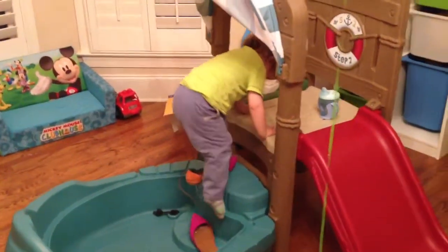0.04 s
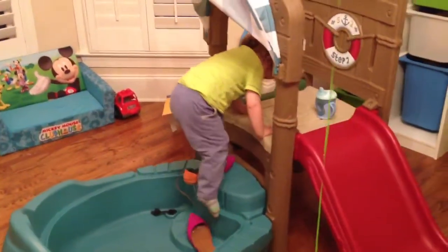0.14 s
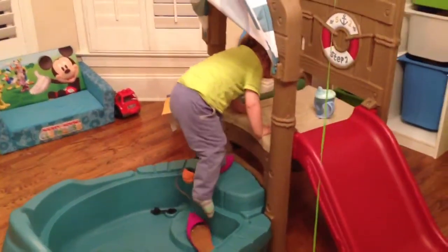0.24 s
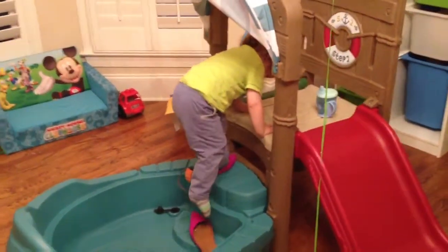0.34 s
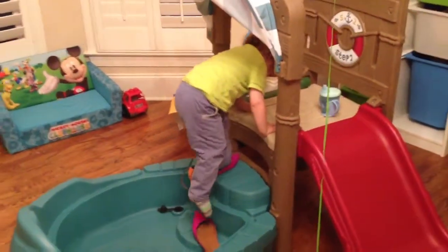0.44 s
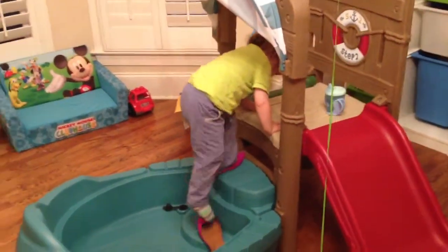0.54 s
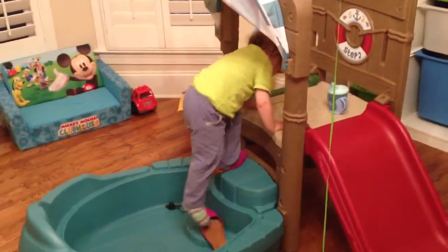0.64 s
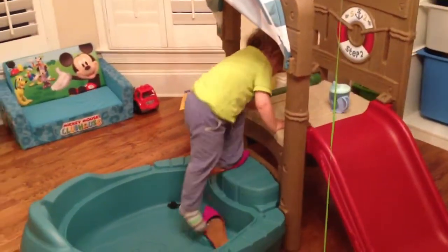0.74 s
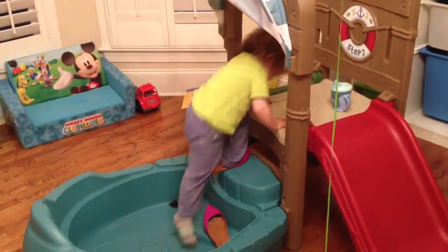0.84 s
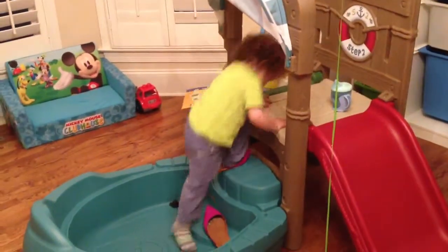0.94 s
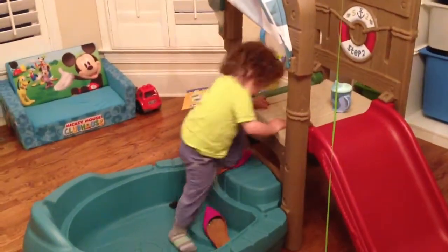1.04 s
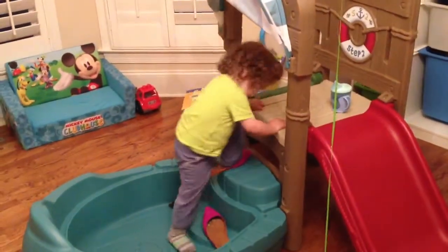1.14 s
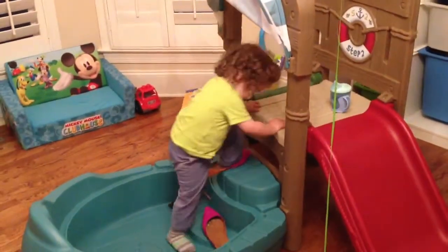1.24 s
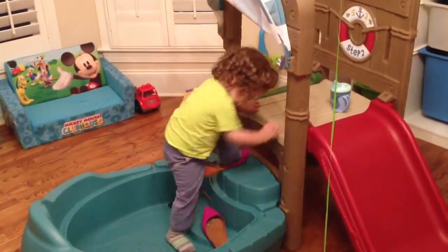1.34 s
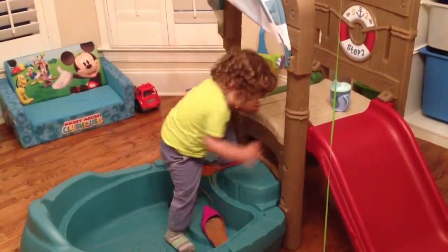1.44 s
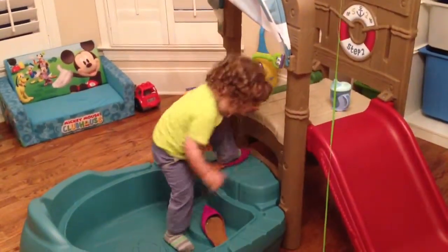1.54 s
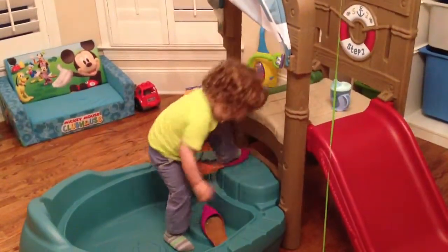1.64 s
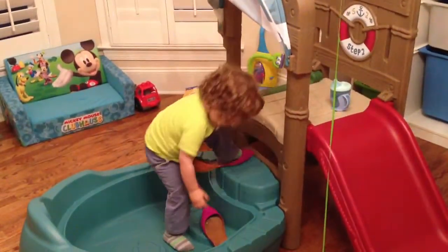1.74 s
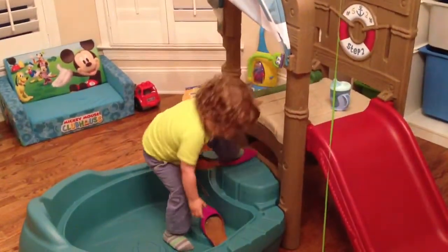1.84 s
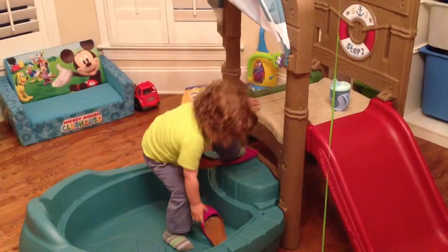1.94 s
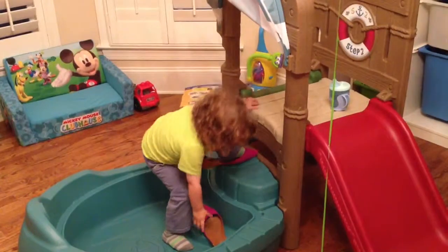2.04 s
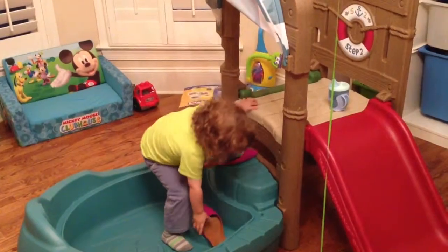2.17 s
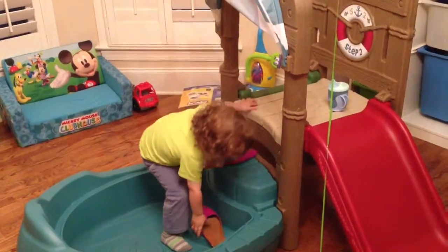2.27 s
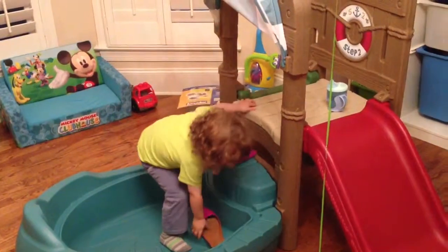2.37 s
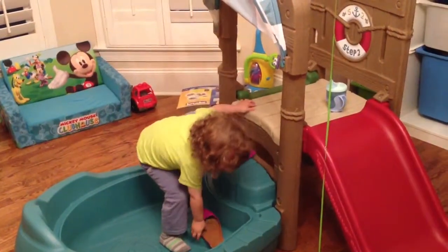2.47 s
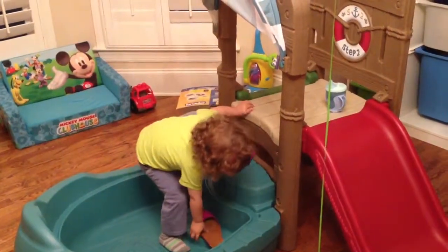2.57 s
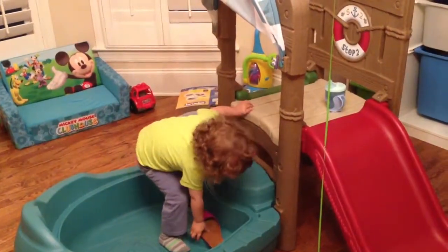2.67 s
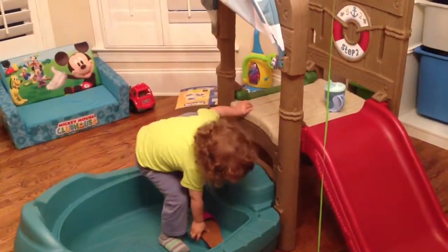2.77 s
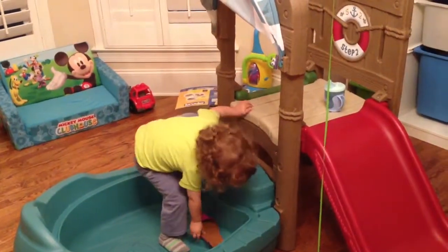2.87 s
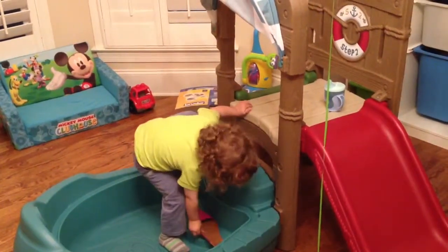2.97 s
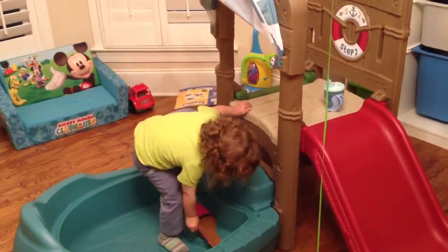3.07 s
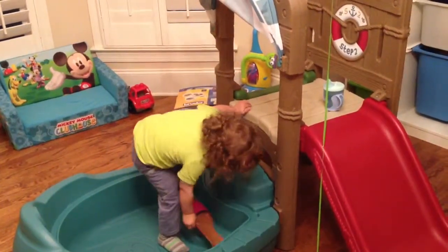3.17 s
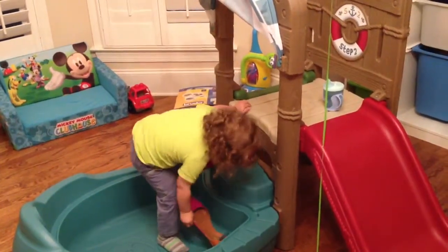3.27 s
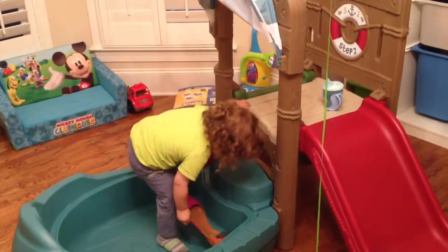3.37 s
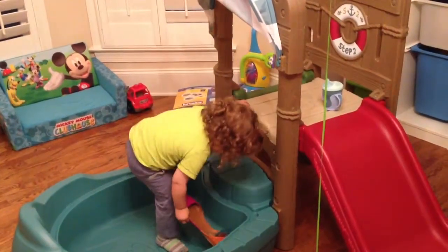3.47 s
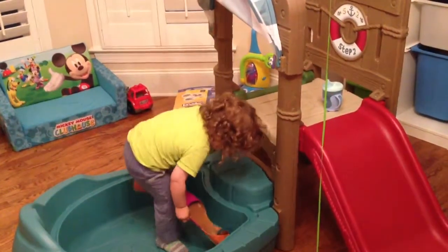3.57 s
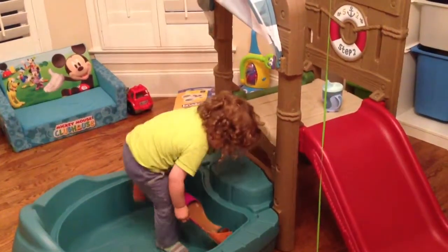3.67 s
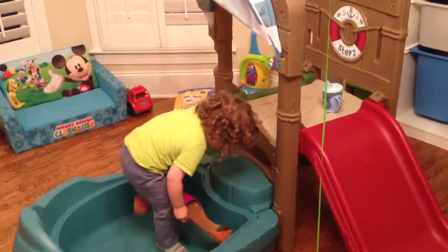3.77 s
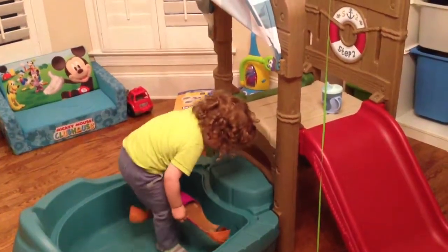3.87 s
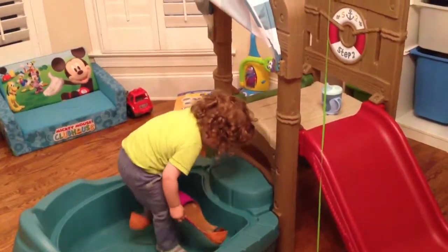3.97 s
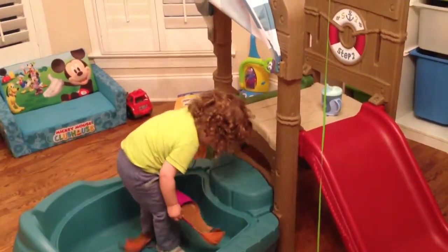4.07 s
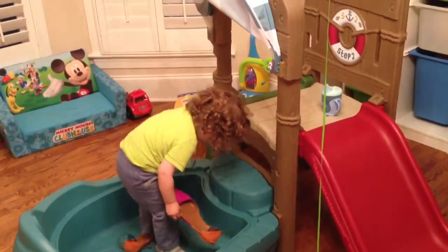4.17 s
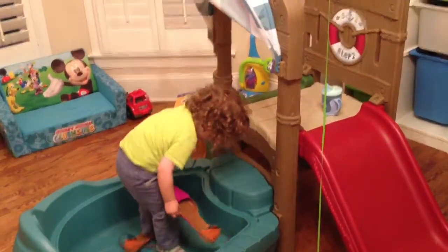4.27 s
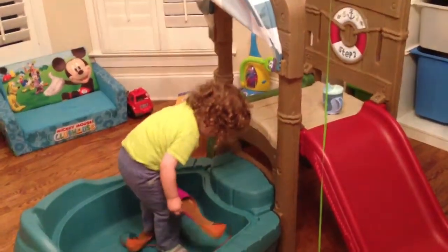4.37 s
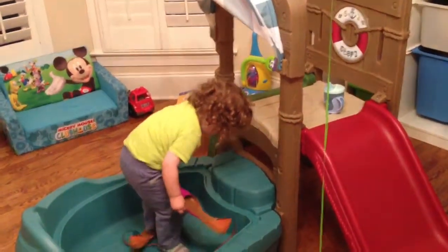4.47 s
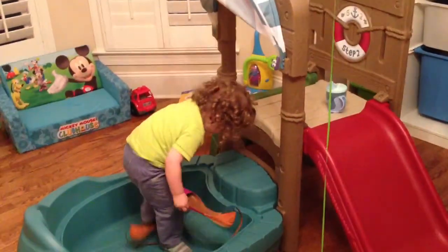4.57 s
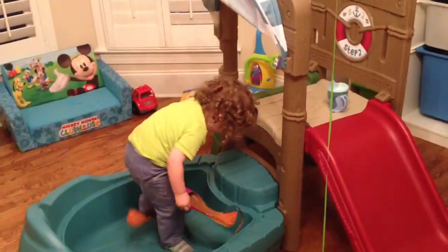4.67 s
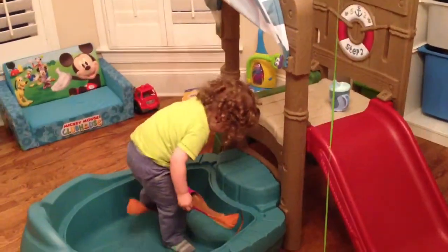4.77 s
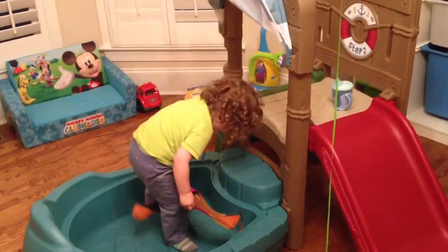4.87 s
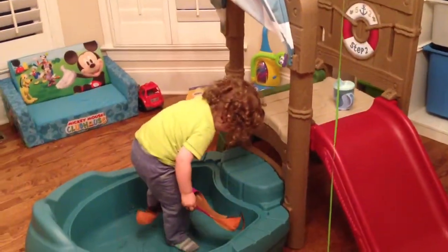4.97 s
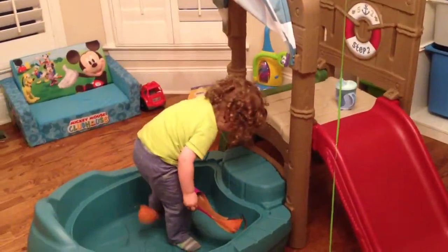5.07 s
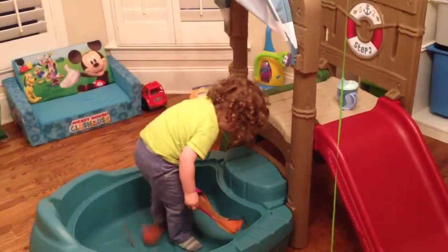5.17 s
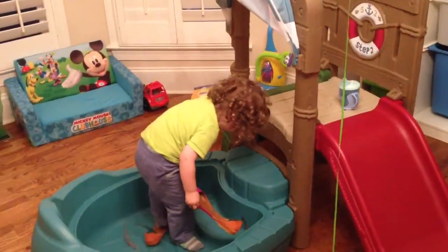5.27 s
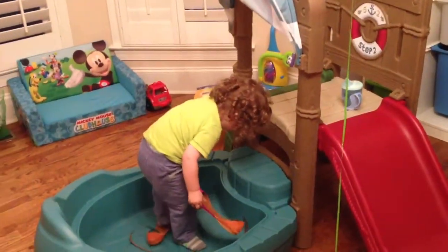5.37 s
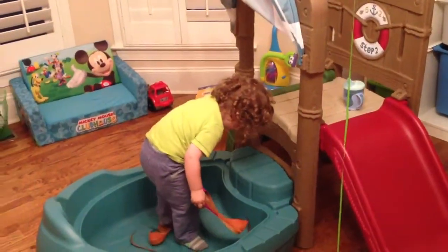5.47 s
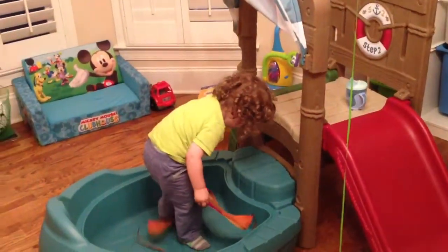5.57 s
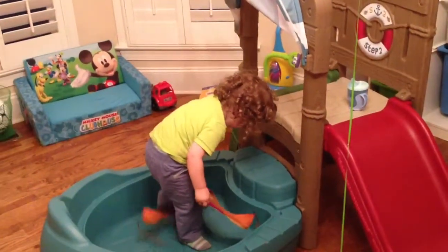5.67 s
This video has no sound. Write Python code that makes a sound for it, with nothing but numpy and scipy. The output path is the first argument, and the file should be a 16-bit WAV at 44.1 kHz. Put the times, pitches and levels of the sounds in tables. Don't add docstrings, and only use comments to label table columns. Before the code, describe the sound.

A hollow plastic shell is tapped, scuffed and bumped in a bare live room; quiet handling builds to a hard, bright knock near the end.

```python
import sys
import numpy as np
from scipy import signal
from scipy.fft import rfft, irfft, next_fast_len
from scipy.io import wavfile
from scipy.ndimage import map_coordinates

SR = 44100
rng = np.random.default_rng(int(sys.argv[2]) if len(sys.argv) > 2 else 0)


def unload_audio(sound):
    columns = np.transpose(np.atleast_2d(sound))
    steps = np.round(np.clip(columns, -1, 1) * 32767)
    wavfile.write(sys.argv[1], SR, steps.astype(np.int16))


def natural_amplitude(level_db):
    exponent = np.asarray(level_db, float) / 20
    return 10 ** exponent


N = 251811


def unit(x):
    return x / np.sqrt(np.mean(x ** 2) + 1e-20)


def along(points, hz):
    f, value = np.transpose(points)
    return np.interp(np.log(hz + 1), np.log(f + 1), value)


def wobble(rate):
    knots = rng.standard_normal(int(N * rate / SR) + 4)
    return map_coordinates(knots, [np.arange(N) * rate / SR])


def filtered(x, response):
    m = next_fast_len(len(x) + 8192)
    return irfft(rfft(x, m) * response(np.fft.rfftfreq(m, 1 / SR)), m)[:len(x)]


def modes(table, scatter_db=0, blur=1):
    luck = natural_amplitude(scatter_db * rng.standard_normal(len(table)))

    def response(f):
        total = 0
        for k, (centre, width, db) in enumerate(table):
            damping = 1j * f * width * blur
            total = total + (-1) ** k * luck[k] * natural_amplitude(db) * damping / (centre ** 2 - f * f + damping)
        return total
    return response


def noise(spectrum):
    return unit(filtered(rng.standard_normal(N), lambda hz: natural_amplitude(along(spectrum, hz))))


# f/Hz, t60/s
ROOM = [(60, 0.79), (150, 0.42), (400, 0.76), (2000, 0.76), (5000, 0.71), (8000, 0.54), (12000, 0.39),
        (16000, 0.22)]
# level/dB re late field, t60/s
EARLY = (4.85, 0.16)


def room(x):
    hz, t, z = signal.stft(rng.standard_normal(SR), SR, nperseg=256)
    late = natural_amplitude(-60 * t / along(ROOM, hz)[:, None])
    early_db, early_t60 = EARLY
    early = natural_amplitude(early_db - 60 * t / early_t60)
    tail = signal.istft(z * np.hypot(late, early), SR, nperseg=256)[1]
    tail = tail * (1 - np.exp(-np.arange(len(tail)) / SR / 0.0015))
    return signal.fftconvolve(x, tail / np.linalg.norm(tail))


def add(track, s, sound):
    part = track[round(s * SR):][:len(sound)]
    part += sound[:len(part)]


# f/Hz, level/dB per Hz
RUMBLE = [(15, -87), (25, -46), (60, -37.5), (102, -15), (141, -2.5), (216, -1), (300, -7.5), (420, -10),
          (600, -13), (1000, -16), (1500, -20), (1950, -26), (3300, -120)]
# f/Hz, level/dB per Hz
MIC_HISS = [(880, -76), (1500, -7), (1750, -1), (1890, -1), (2990, -3), (3230, -2.5), (5410, -5.5),
            (5900, -3.5), (9880, -10), (14600, -6), (15300, -7)]
# f/Hz, width/Hz, level/dB
DRONE = (378, 14, -70)


def background():
    rumble = natural_amplitude(-63.5 + 1.46 * wobble(3.407)) * noise(RUMBLE)
    hiss = natural_amplitude(-71 + 0.5 * wobble(3.84)) * noise(MIC_HISS)
    hz, width, db = DRONE
    drone = unit(filtered(rng.standard_normal(N), modes([(hz, width, 0)])))
    return rumble + hiss + natural_amplitude(db + 1.9 * wobble(2.2)) * drone


def swell(s, hold_s, db, edge_s):
    t = np.arange(N) / SR - s
    release = 1.48
    away = np.maximum(-t, (t - hold_s) / release).clip(0)
    return natural_amplitude(db - 19 * np.minimum(away / edge_s, 8))


# t/s, hold/s, rasp level/dB, edge/s, shell level/dB re rasp
SCUFFS = [(0.77, .1, -75.5, 0.13, -17), (0.953, .01, -69, 0.11, 3), (1.065, .002, -63.5, .04, 7.5),
          (1.143, 0.19, -67.5, 0.15, 0), (1.707, 0.017, -59.5, 0.052, 2), (1.879, .002, -60.5, 0.12, 1.3),
          (2.869, 0.0045, -69.5, 0.069, 2.5), (2.992, 0.045, -62, 0.095, 1.5), (3.13, .005, -65.5, 0.11, 5),
          (3.417, 0.036, -66, .1, 5.5), (3.722, .002, -69.5, .017, -5), (5.467, 0.22, -75.5, .05, 15),
          (5.705, .02, -69, .04, 10.5)]
# f/Hz, level/dB per Hz
RASP = [(880, -34), (1500, -34), (2090, -7), (3120, -0.5), (4710, 2.5), (5240, -4), (8130, -3),
        (9890, -10.5), (13700, -8.5), (15500, -14)]
# f/Hz, level/dB per Hz
DRAG = [(240, -27), (400, 0), (594, 0), (953, 2.5), (1170, -1), (2090, -2), (3000, -10.5), (3900, -27),
        (6600, -120)]


def scuffs():
    strokes = np.array([swell(*row[:4]) for row in SCUFFS])
    rasp = strokes.sum(axis=0)
    drag = natural_amplitude([row[4] for row in SCUFFS]) @ strokes
    slips = unit(natural_amplitude(2.3 * wobble(250) + 0.56 * wobble(34.0)))
    dry = slips * (rasp * noise(RASP) + drag * noise(DRAG))
    return natural_amplitude(-2.0) * dry + natural_amplitude(-0.5) * room(dry)[:N]


# t/s, hold/s, level/dB, edge/s
WEIGHT = [(0.94, .02, -60, 0.045), (1.304, .01, -67, 0.046), (1.38, .01, -53.5, 0.13),
          (1.548, 0.089, -75, .06), (1.723, .01, -60.5, .07), (1.82, .14, -56, .06), (2.03, 0.31, -69, .04),
          (2.438, .004, -60, .03), (2.482, .33, -66, .03), (2.887, .01, -57, 0.081),
          (3.023, 0.12, -55, 0.19), (3.469, .005, -49.5, .09), (3.582, .14, -62.5, 0.061),
          (3.868, .005, -55.5, 0.047), (4.604, 0.011, -64, 0.068), (4.935, .015, -68, .1)]
# f/Hz, width/Hz, level/dB
FLEX = [(161.6, 27, 1.5), (213, 38, -4), (279, 59, -4), (379, 87, -6.5)]


def flexing():
    load = sum(swell(*row) for row in WEIGHT)
    boom = filtered(rng.standard_normal(N), modes(FLEX))
    return load * unit(natural_amplitude(2.7 * wobble(25.09)) * boom)


# f/Hz, width/Hz, level/dB
KNOCK = [(597, 34, -5.5), (800, 39.6, 3), (1092, 129, 0.5), (1308, 247, -3.5), (1652, 133, -3.5),
         (1913, 155, -9), (2504, 498, -6), (2880, 1300, -13.5), (3560, 470, -20)]
# f/Hz, width/Hz, level/dB
BOOM = [(100, 36, -3.5), (131, 55, -17.5), (158.5, 36.4, 1), (258, 26.7, 3.5), (334.5, 25, -0.5),
        (388.2, 17.5, 3.5), (480, 125, -4.5)]
# f/Hz, level/dB
TICK = [(1500, -4), (3000, -4.5), (4500, -2), (6000, -3), (9000, -7), (12000, -13), (16000, -11)]


def struck(push, contact, blur):
    strength_db, centre_hz = contact[1], contact[4]
    light, full = 0.38, 2.52
    mid_db, range_db = -36, 0.5
    force = 1 / (1.5 + np.exp((mid_db - strength_db) / range_db))
    spread = light + (full - light) * force
    panels = modes(KNOCK, scatter_db=1.5, blur=blur)
    spot = modes([(centre_hz, spread * centre_hz, 0)])
    knock = filtered(push[0], lambda f: panels(f) * spot(f))
    drums = modes(BOOM, scatter_db=1.5, blur=np.sqrt(blur))
    deep = modes([(centre_hz / 4, centre_hz / 4, 0)])
    boom = filtered(push[1], lambda f: drums(f) * (0.9 + deep(f)))
    tick = filtered(np.roll(push[2], 20), lambda hz: natural_amplitude(along(TICK, hz)))
    return np.array([knock, boom, tick])


# t/s, knock level/dB, boom level/dB re knock, tick level/dB re knock, centre f/Hz
KNOCKS = [(0.9643, -28.5, -7, -20, 1490), (0.978, -35.5, 6.5, -34, 800), (1.196, -45, -32, -16, 1200),
          (1.202, -44.5, -28, -15, 1220), (2.650, -48, -23, -22, 1650), (2.886, -53.5, 4.5, -20, 800),
          (2.901, -70, -20, 0, 3000), (4.067, -37, 1.2, -5.5, 1480), (4.085, -44, 2.5, -28, 910),
          (4.145, -45, 12.5, -33, 700), (4.154, -28, -3.5, -15, 1130), (4.169, -36, 10.5, -39, 925),
          (4.189, -37, -2, -23, 800), (4.998, -53, 4.5, -28, 1580), (5.013, -62.5, 18.5, -33, 600),
          (5.1988, -29, -3.5, -1, 970), (5.238, -10, -10, -1.5, 2660), (5.246, -17, 4, -30, 1580),
          (5.255, -15, 2, -30, 2400)]


def knocks():
    track, t = np.zeros(N), np.arange(SR // 5) / SR
    shape = [np.exp(-t / .0025), t * np.exp(-t / .002), np.exp(-t / .0013)]
    impulse = np.tile(1. * (t == 0), (3, 1))
    for contact in KNOCKS:
        s, db, boom_db, tick_db = contact[:4]
        direct = struck(rng.standard_normal((3, len(t))) * shape, contact, blur=1.0)
        direct = direct / np.max(np.abs(direct), axis=1, keepdims=True)
        direct = direct * natural_amplitude(db - 1 + np.array([[0], [boom_db], [tick_db + 3.5]]))
        add(track, s, direct.sum(axis=0))
        around = struck(impulse, contact, blur=2)
        energy = np.linalg.norm(direct, axis=1) / np.linalg.norm(around, axis=1)
        for layer, size in zip(around, energy * natural_amplitude([5.5, 3.5, 3.5])):
            add(track, s + .002, size * room(layer))
    return track


# t/s, peak level/dB, f/Hz
BUMPS = [
    (1.378, -35, 232),
    (1.414, -40, 194),
    (2.471, -40.5, 280),
    (2.879, -42, 260),
    (3.456, -33.5, 190),
    (3.489, -29.5, 180),
    (3.86, -40.5, 260),
    (4.03, -44, 266),
    (5.033, -34.5, 168),
]


def bumps():
    track, t = np.zeros(N), np.arange(SR // 5) / SR
    for s, db, hz in BUMPS:
        envelope = natural_amplitude(db - 60 * t / 0.081) * (1 - np.exp(-t / 0.0076))
        dry = envelope * np.sin(2 * np.pi * hz * t)
        add(track, s, dry)
        add(track, s, natural_amplitude(-11) * room(dry))
    return track


def scene():
    steady = background()
    near = scuffs() + flexing() + knocks() + bumps()
    mic_hz = 103
    near = filtered(near, lambda f: (1j * f / (mic_hz + 1j * f)) ** 3)
    return (near + steady)[None]


def top_cut(x):
    return signal.sosfilt(signal.butter(12, 16270, fs=SR, output="sos"), x)


def record(dry):
    top_hz = 15330
    mix = filtered(dry[0], lambda hz: hz < top_hz)[None]
    return top_cut(mix)


dry = scene()
out = record(dry)
unload_audio(out)
```